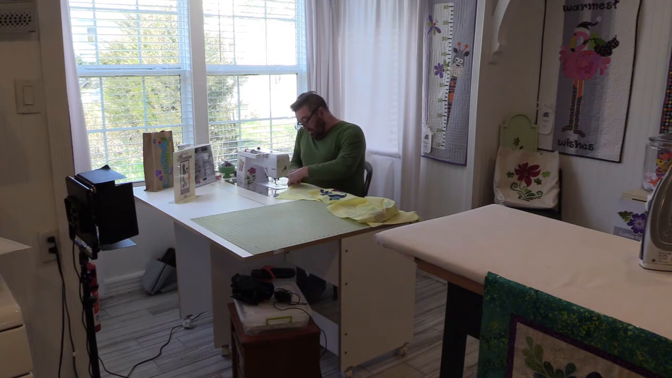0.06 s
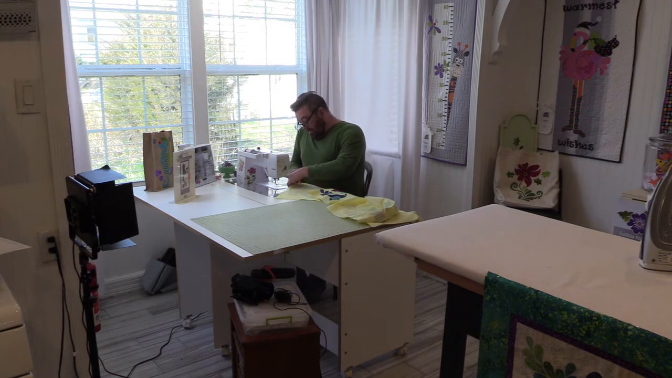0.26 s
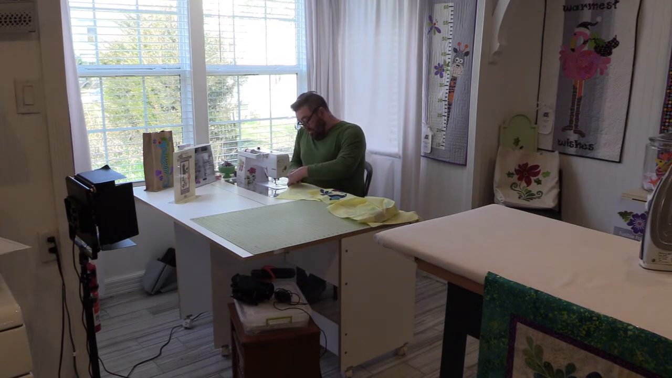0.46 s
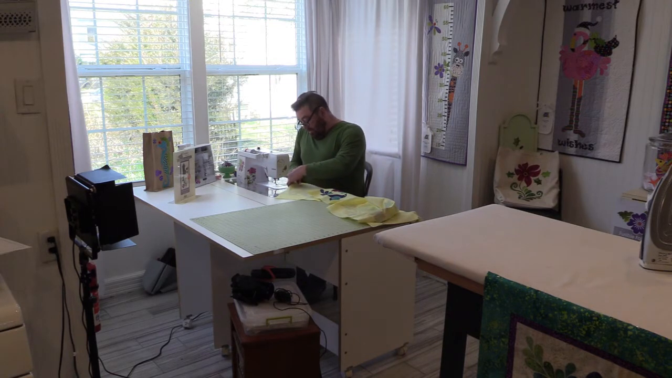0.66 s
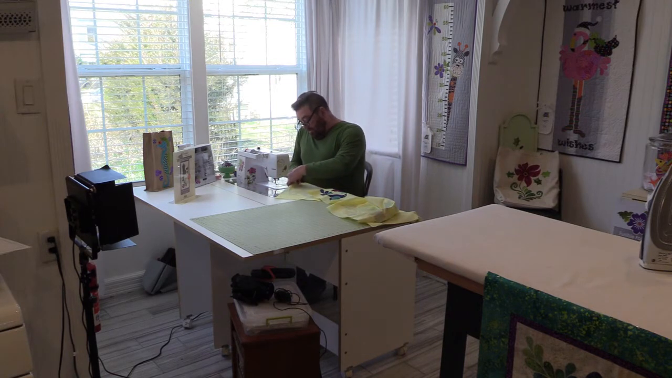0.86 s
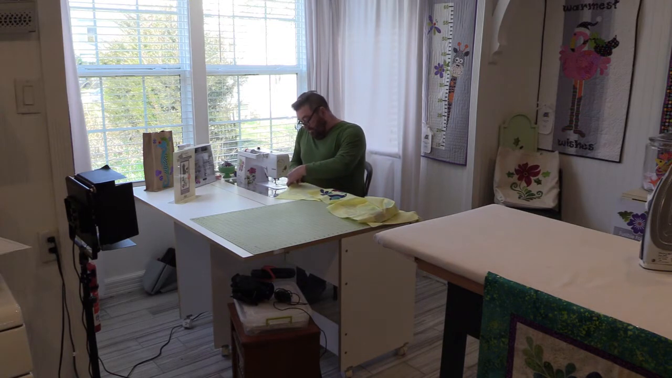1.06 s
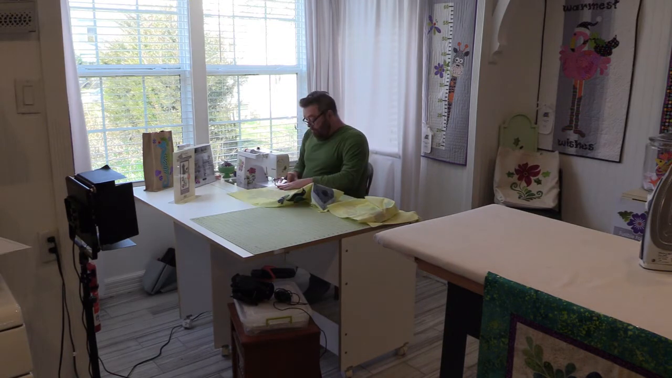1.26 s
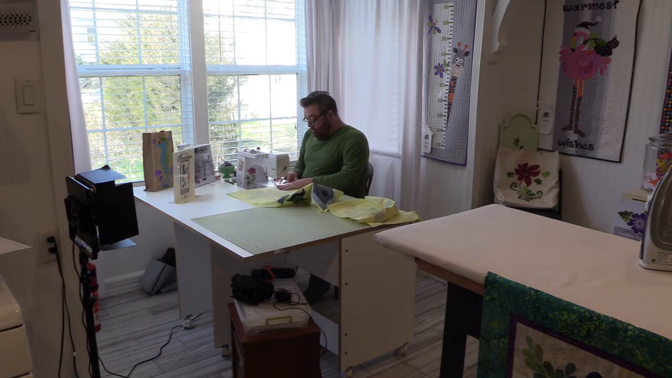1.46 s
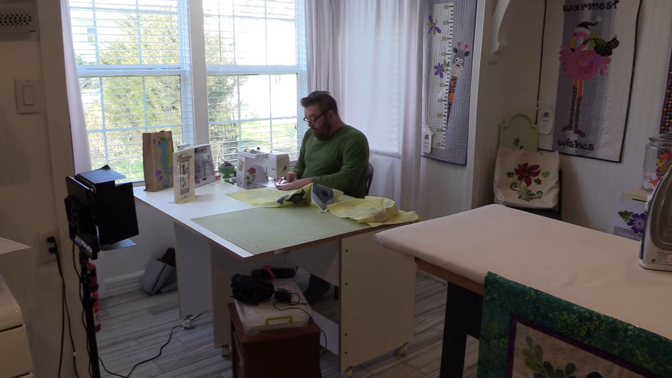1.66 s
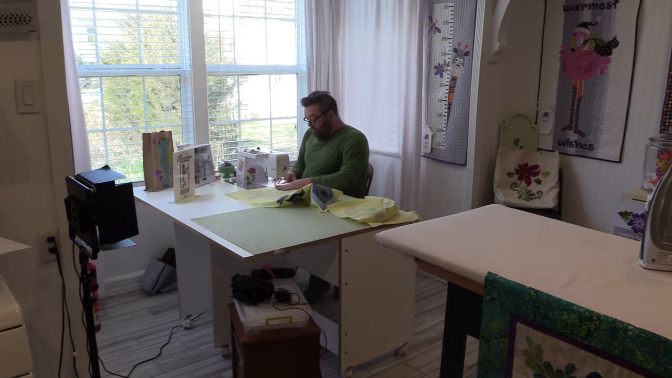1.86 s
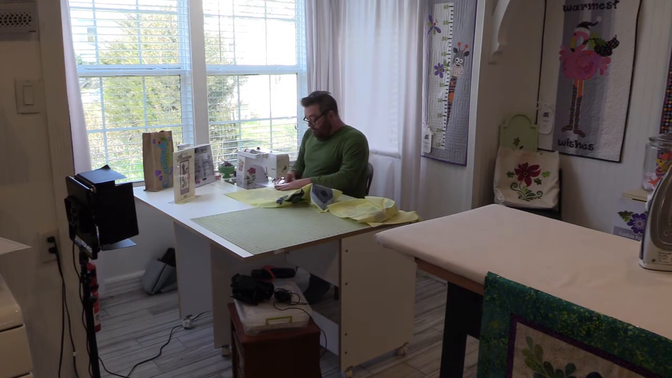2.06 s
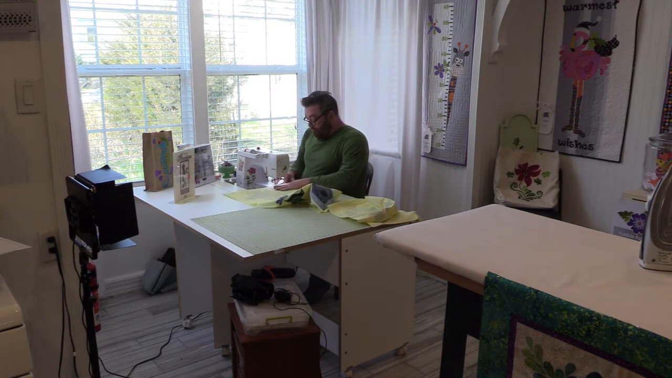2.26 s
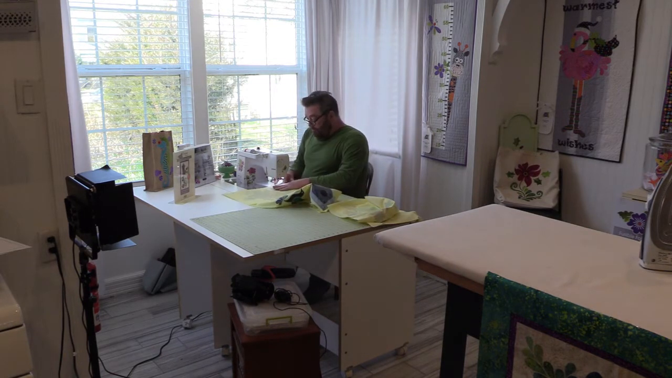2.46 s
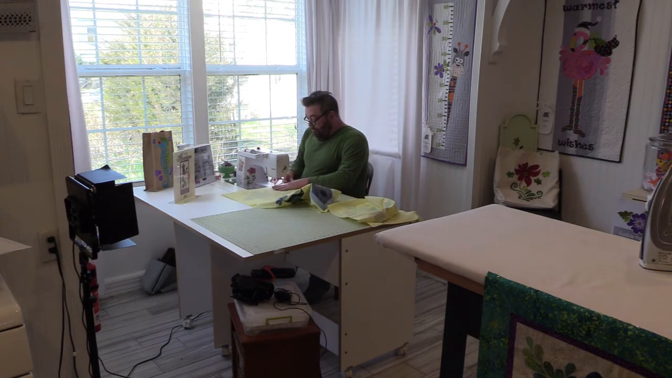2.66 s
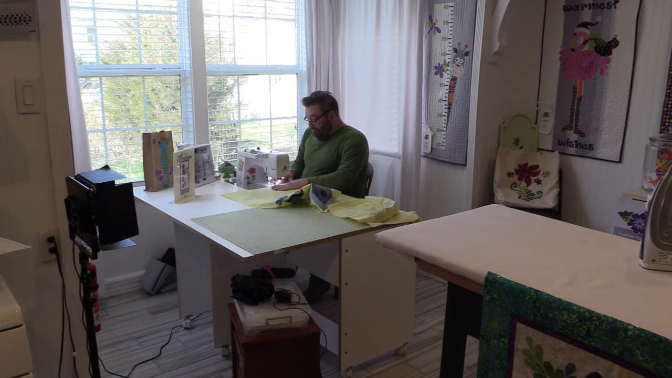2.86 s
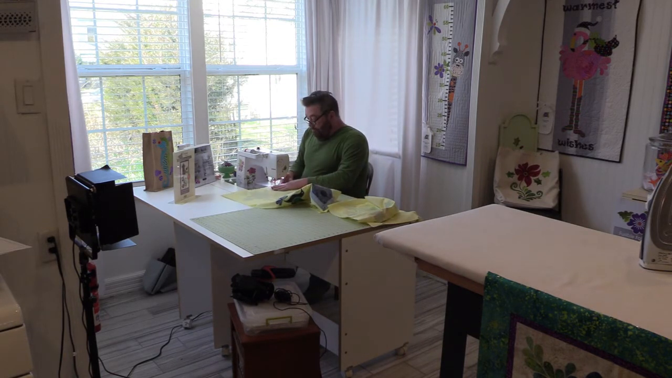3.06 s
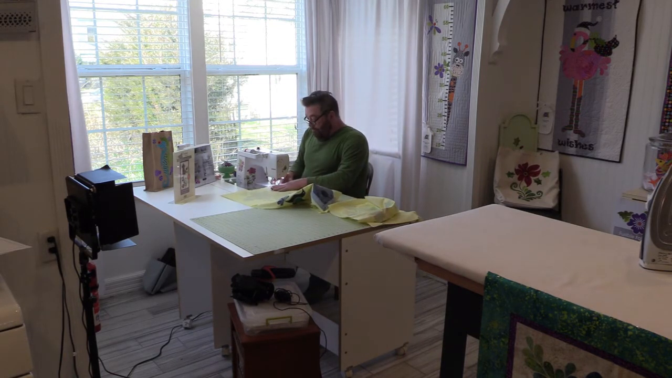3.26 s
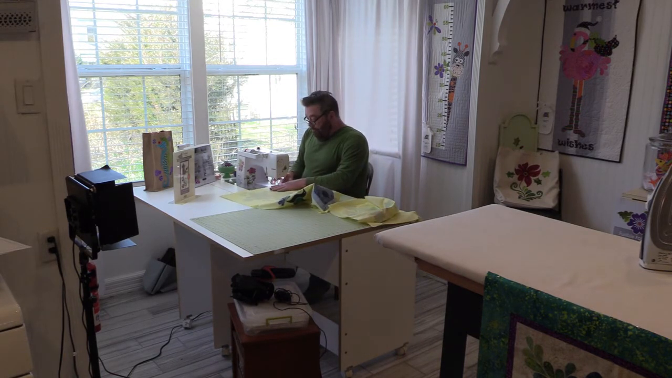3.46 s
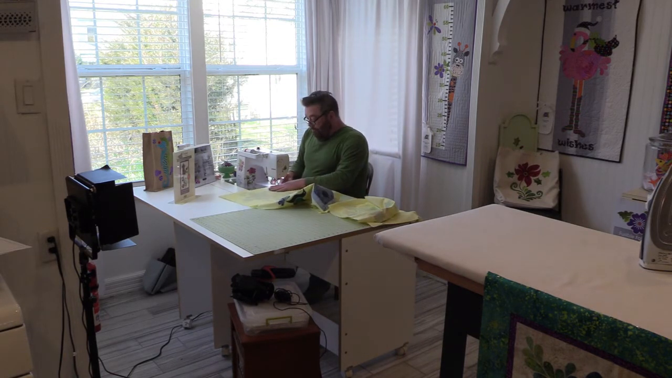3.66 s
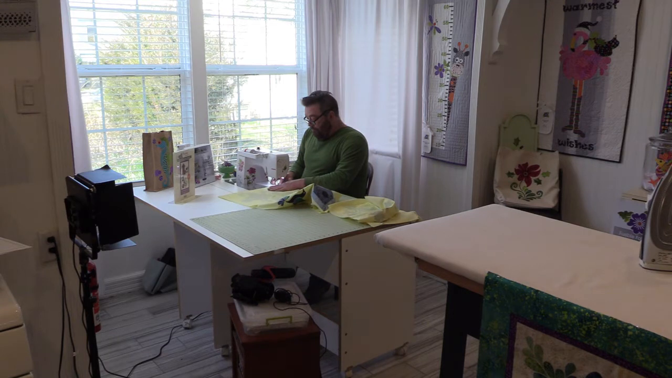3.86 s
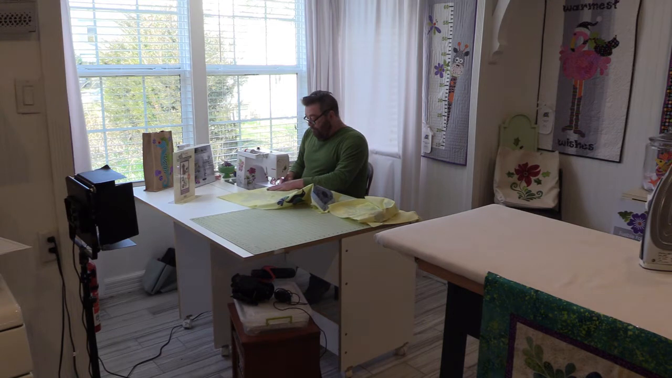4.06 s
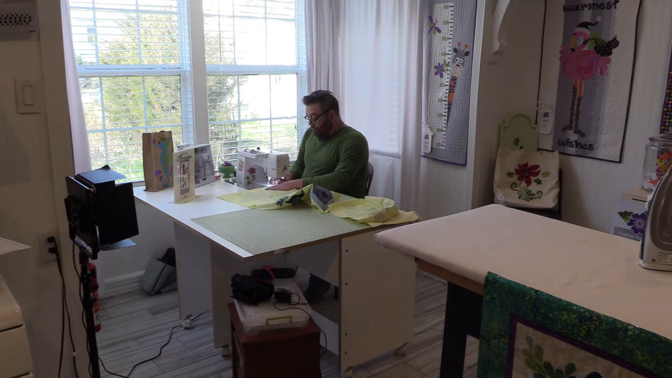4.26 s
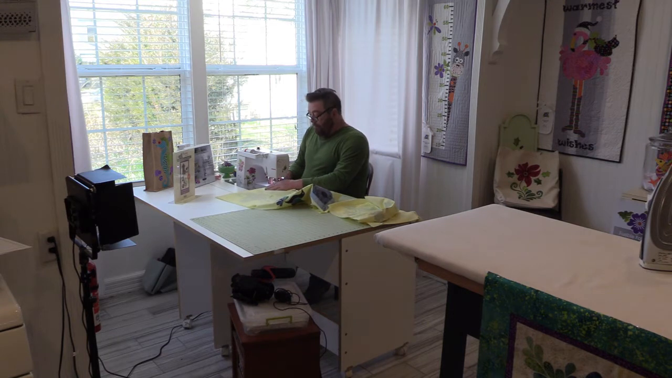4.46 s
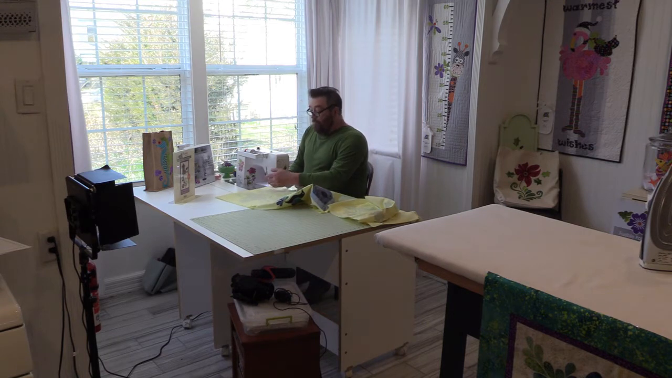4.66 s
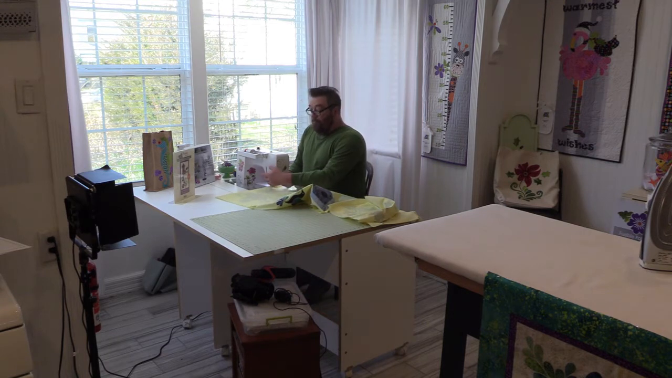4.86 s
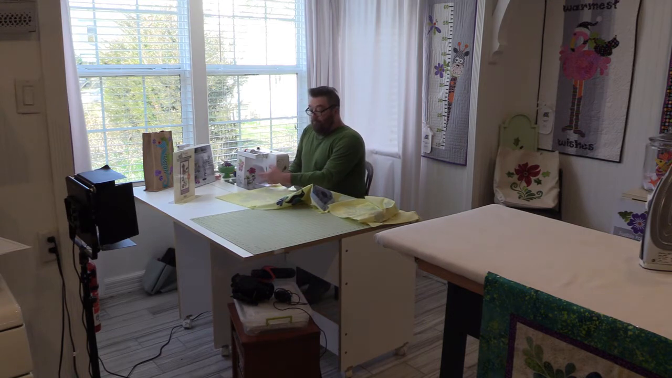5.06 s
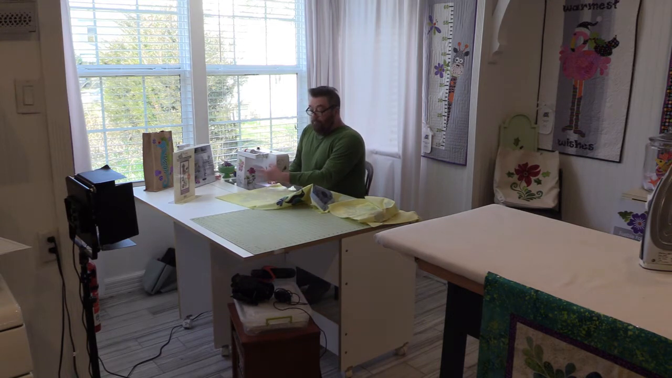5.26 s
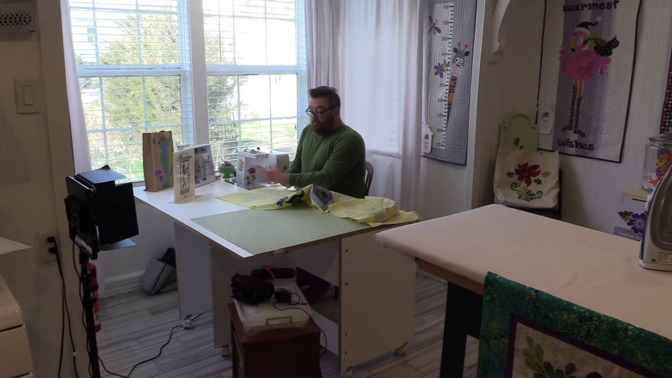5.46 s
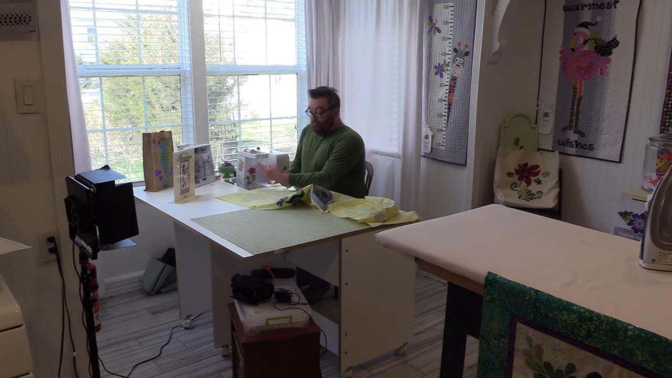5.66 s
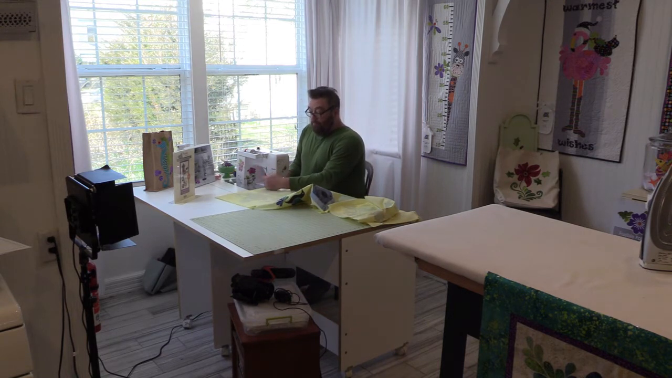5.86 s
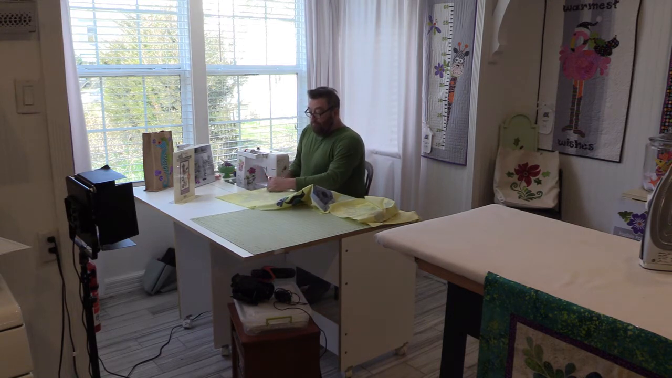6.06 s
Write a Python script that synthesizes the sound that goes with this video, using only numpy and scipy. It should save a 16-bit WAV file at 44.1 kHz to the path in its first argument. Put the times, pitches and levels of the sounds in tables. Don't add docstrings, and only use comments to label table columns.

```python
import sys
import numpy as np
from scipy import signal
from scipy.io import wavfile
from scipy.ndimage import uniform_filter1d

SR = 44100
rng = np.random.default_rng(int(sys.argv[2]) if len(sys.argv) > 2 else 0)


def output_pcm(signal):
    pcm = np.clip(np.atleast_2d(signal).T, -1, 1) * 32767
    wavfile.write(sys.argv[1], SR, np.round(pcm).astype(np.int16))


def linear_from_db(decibels):
    return 10 ** (np.asarray(decibels, float) / 20)


N = 269582
T = np.arange(N) / SR
HZ = np.fft.rfftfreq(4096, 1 / SR)
START_S, BRAKE_S, STOP_S = 1.27, 4.49, 4.98
TOP_S = 2.948
STEADY = slice(3 * SR, 4 * SR)
COARSE = slice(None, None, 256)


def evened(x, where=slice(None)):
    return x / np.sqrt(np.mean(x[where] ** 2) + 1e-20)


def read(points, hz):
    f, value = np.transpose(points)
    return np.interp(np.log(hz + 1), np.log(f + 1), value)


def colour(x, db):
    log_gain = np.log(linear_from_db(np.maximum(db, -100)))
    circle = np.r_[log_gain, log_gain[-2:0:-1]]
    taps = np.fft.ifft(np.exp(np.conj(signal.hilbert(circle)))).real
    return signal.oaconvolve(x, taps[:len(HZ)])[:N]


def peaks(hz, modes):
    return sum(height / (1 + (2 * (hz - f) / width) ** 2) for f, width, height in modes)


def after(s):
    return np.maximum(T - s, 0)


def burst(s, db, rise_s, t60):
    return np.minimum(after(s) / rise_s, 1) * linear_from_db(db - 60 * after(s) / t60)


# (frequency [Hz], level [dB])
HUM = [(60, -35), (180, -43.5), (240, -59), (300, -54.5), (420, -60.5), (540, -58), (660, -58), (780, -65),
       (900, -69), (1020, -64.5)]
# (frequency [Hz], level [dB per Hz])
AIR = [(500, -30), (720, -6), (1000, -4), (2300, -1.5), (3200, -8), (4000, -10.5), (8000, -13),
       (15700, -16.5)]
# (frequency [Hz], level [dB])
RUMBLE = [(15, 7.5), (30, 9.5), (75, -7), (120, 0), (350, -8.5), (670, -5), (900, -14), (1500, -40)]


def background():
    hum = sum(np.sqrt(2) * linear_from_db(db) * np.sin(2 * np.pi * (hz * T + rng.random())) for hz, db in HUM)
    air = evened(colour(rng.standard_normal(N), read(AIR, HZ)))
    rumble = evened(colour(rng.standard_normal(N), read(RUMBLE, HZ)))
    return hum + linear_from_db(-53.5) * air + linear_from_db(-46.5) * rumble


# (frequency [Hz], level [dB per Hz])
CLOTH = [(130, -34), (220, -10), (362, 2), (525, -10), (863, -10), (1370, -22), (2200, -15), (9000, -64)]
# (time [s], level [dB], t60 [s])
CLOTH_STROKES = [
    (0.0, -49, 1.0),
    (.165, -43, .6),
    (.33, -54, .5),
                 (4.9, -35, 0.28),
    (6.0, -43, 2.3),
]


def cloth():
    hands_s, hands_db = 4.9, -43.5
    level = linear_from_db(hands_db) * (T > hands_s)
    for s, db, t60 in CLOTH_STROKES:
        level = level + burst(s, db, 0.0019, t60)
    clumps = evened(uniform_filter1d(rng.standard_normal(N), size=900))
    rustle = rng.standard_normal(N) * linear_from_db(2.5 * clumps)
    return level * evened(colour(rustle, read(CLOTH, HZ)))


# (frequency [Hz], t60 [s])
RING_T60 = [(120, 0.045), (210, 0.02), (345, 0.11), (600, 0.03), (1100, 0.05), (2300, 0.018), (5300, 0.007),
            (8000, 0.012)]


def strike(blows, crack_hz, rise_s, crack_t60):
    out = np.zeros(N + SR)
    t = T[:SR // 2]
    band = signal.butter(3, [.4 * crack_hz, 1.5 * crack_hz], "bandpass", fs=SR)
    for s, ring_db, ring_hz, crack_db in blows:
        fade = linear_from_db(-60 * t / read(RING_T60, ring_hz))
        onset = np.minimum(t / max(1 / ring_hz, rise_s), 1)
        mode = fade * np.sin(2 * np.pi * ring_hz * t) * onset
        chatter = rng.standard_normal(len(t)) * fade * ring_hz * 4e-5
        chatter[0] = 1
        ring = signal.fftconvolve(mode, chatter)[:len(t)]
        puff = rng.standard_normal(len(t)) * linear_from_db(-60 * t / crack_t60) * np.minimum(t / rise_s, 1)
        crack = signal.lfilter(*band, puff)
        blow = linear_from_db(ring_db) * ring / abs(ring).max() + linear_from_db(crack_db) * crack / abs(crack).max()
        out[round(s * SR):][:len(t)] += blow
    return out[:N]


# (time [s], ring level [dB], ring [Hz], crack level [dB])
HAND_TAPS = [
    (.163, -40, 620, -33),
             (5.064, -28.5, 458, -44), (5.092, -38, 510, -43), (5.164, -33, 423, -41), (5.172, -31, 657, -38),
        (5.18, -42, 400, -45), (5.212, -36, 330, -50), (5.264, -34.5, 520, -48), (5.345, -39, 865, -46),
        (5.37, -37, 420, -36), (5.41, -22.5, 334, -39), (5.423, -43, 341, -46), (5.446, -45, 342, -55),
        (5.549, -29, 362, -50), (5.574, -29.5, 516, -35), (5.576, -36.5, 1150, -44)]


def taps():
    return strike(HAND_TAPS, crack_hz=1500, rise_s=.005, crack_t60=.06)


def shaft():
    halfway_s, runup_s, coast_s = 1.5, .115, .21
    cruise = 13.95 + np.interp(T, (2.15, 2.85), [0, .27])
    runup = 1 + np.exp(np.minimum((halfway_s - T) / runup_s, 2))
    return cruise / runup * np.exp(-np.minimum(after(BRAKE_S) / coast_s, 2.6))


def knocks(turns, angle, size, jitter_s, spread_db):
    at = np.arange(int(turns[-1]))[:, None] + angle
    s = np.interp(at, turns, T) + jitter_s * rng.standard_normal(at.shape)
    out = np.zeros(N)
    heights = size * linear_from_db(spread_db * rng.standard_normal(at.shape))
    np.add.at(out, (s * SR).astype(int) % N, heights)
    return out


# (time [s], level [dB], hiss relative level [dB], t60 [s])
LURCHES = [
    (1.282, -27.5, -22, 0.36),
    (1.384, -27, -32, 0.96),
    (1.527, -25, -3, 0.087),
    (1.588, -38, -22, .4),
    (1.98, -12, -22, 0.13),
    (4.5, -15.5, -13, 1),
    (4.755, -25, -12, 0.32),
    (4.814, -21, -22, 0.36),
    (4.857, -15.5, -31, 0.17),
]


def effort(speed):
    let_go_s = 4.606
    top_speed_so_far = np.maximum.accumulate(speed) / speed.max()
    run_db = -12 + 49 * np.log10(top_speed_so_far)
    casing_power = linear_from_db(run_db - 89 * after(let_go_s)) ** 2
    hiss_power = linear_from_db(run_db - 89 * after(let_go_s) - 10.5 - 90 * after(let_go_s)) ** 2
    for s, db, hiss_db, t60 in LURCHES:
        shake = burst(s, db, 0.0052, t60)
        casing_power = casing_power + shake ** 2
        hiss_power = hiss_power + (shake * linear_from_db(hiss_db)) ** 2
    return np.sqrt(casing_power), np.sqrt(hiss_power)


# (frequency [Hz], level [dB per Hz])
CASING = [(41, -51), (70, -24), (182, -15), (341, -11), (451, -8), (648, -2.5), (777, 0.5), (1050, -7),
          (1340, 0), (1960, -6), (2120, -12.5), (2310, -3), (3600, -13.5), (4680, -26), (7920, -120)]
# (frequency [Hz], width [Hz], height [dB])
PANELS = [(341, 147, 11.5), (878, 220, 2.5), (1430, 150, -1.5), (1600, 82, -0.4), (2102, 110, 10),
          (3460, 42, -1), (3710, 120, -4.5)]


def casing_db(hz):
    return read(CASING, hz) + peaks(hz, PANELS)


# (frequency [Hz], share [0 to 1])
REPEATS = [(100, .5), (350, .35), (700, .3), (1400, .1), (2800, .03)]


def casing_rattle(alike, turns):
    feed_turns = turns - np.interp(TOP_S, T, turns) - .16
    feed_db = 1.5 * np.cos(4 * np.pi * feed_turns)
    contacts = rng.standard_normal(N) * linear_from_db(1.0 * rng.exponential(1, N) + feed_db)
    loose = evened(contacts * (rng.random(N) < .2))
    share = np.clip(read(REPEATS, HZ), 0, 1)
    body = colour(alike, casing_db(HZ) + 10 * np.log10(share))
    body += colour(loose, casing_db(HZ) + 10 * np.log10(1 - share))
    return evened(body, STEADY)


# (frequency [Hz], level [dB per Hz])
SLIDING = [(1940, -23), (3300, -7), (3810, -14.5), (4200, -13), (5510, -16.5), (5960, -19), (10700, -27.5),
           (15600, -41)]


def sliding_hiss(alike, turns):
    stroke_db = 1.1 * np.cos(8 * np.pi * turns + 0.96)
    stroke_db += 0.4 * np.cos(4 * np.pi * turns) + 0.7 * np.cos(16 * np.pi * turns)
    tick_db = 1.3 * np.minimum(rng.exponential(1, N), 7) + stroke_db
    ticks = rng.standard_normal(N) * linear_from_db(tick_db) * (rng.random(N) < .5)
    return evened(colour(ticks + .1 * alike, read(SLIDING, HZ)), STEADY)


def struck(turns, blows, modes):
    response = peaks(HZ, [(hz, width, linear_from_db(db)) for hz, width, db in modes])
    angle, db = np.transpose(blows)
    angle = (angle + np.interp(TOP_S, T, turns)) % 1
    train = knocks(turns, angle, linear_from_db(db), jitter_s=3e-4, spread_db=2)
    return evened(colour(train, 20 * np.log10(response)), STEADY)


# (shaft angle [turns], level [dB])
NEEDLE = [
    (0.08, -4),
    (0.2, -5),
    (0.55, 0),
    (.66, -3),
    (.78, -5),
]
# (frequency [Hz], width [Hz], height [dB])
BED = [(362, 40.4, 10), (459.6, 18, 5), (529.6, 50, -3), (832, 330, -3.5)]


def needle_bar(turns):
    return linear_from_db(-4.5) * struck(turns, NEEDLE, BED)


# (shaft angle [turns], level [dB])
HOOK = [
    (.03, -2),
    (.39, 0),
    (.53, 0),
    (.66, -3),
    (.79, 1),
    (.92, -4),
]
# (frequency [Hz], width [Hz], height [dB])
RACE = [(520, 120, 0)]


def bobbin_hook(turns):
    return linear_from_db(-12) * struck(turns, HOOK, RACE)


# (shaft angle [turns], level [dB])
TAKE_UP = [
    (.19, -3),
    (.69, 0),
]
# (frequency [Hz], width [Hz], height [dB])
ARM = [(2070, 220, 5), (5400, 2500, -16.5)]


def thread_lever(turns):
    return linear_from_db(-19.5) * struck(turns, TAKE_UP, ARM)


def wavering(turns, k):
    drift = evened(uniform_filter1d(rng.standard_normal((2, len(T[COARSE]))), size=24, axis=1))
    phase = 2 * np.pi * (k * turns + rng.random()) + np.interp(T, T[COARSE], .004 * k * drift[1])
    return np.sqrt(2) * np.interp(T, T[COARSE], linear_from_db(2.0 * drift[0])) * np.sin(phase)


# (multiple of the stitch rate, level [dB])
ORDERS_DB = [(5, -41), (6, -45), (8, -40), (9, -44), (10, -38), (11, -43), (12, -43), (13, -40), (15, -39),
             (16, -40), (17, -32), (18, -36), (19, -32), (24, -25), (26, -33), (30, -28), (32, -25.5),
             (38, -35), (40, -28), (44, -33), (52, -31), (54, -34), (56, -32), (58.35, -30), (64, -29.5),
             (68, -33), (70, -40), (71, -35), (78, -36), ]


def shaft_tones(turns, speed):
    out = np.zeros(N)
    for k, db in ORDERS_DB:
        lift_db = casing_db(k * speed[COARSE]) - casing_db(k * speed.max())
        out += np.interp(T, T[COARSE], linear_from_db(db + lift_db)) * wavering(turns, k)
    return out


# (multiple of the stitch rate, level [dB])
TEETH = [(150, 0), (146, -9), (147, -6), (154, -11), (142, -12), (138, -13), (92, 2), (125, -6), (184, -2),
         (229.5, -7), (242.8, -6)]
# (frequency [Hz], width [Hz], height [dB])
COVER = [(1455, 110, 11), (1720, 200, 4), (1900, 130, 11), (2080, 170, 10)]


def gears(turns, speed):
    out = np.zeros(N)
    for k, db in TEETH:
        lift_db = peaks(k * speed[COARSE], COVER)
        out += np.interp(T, T[COARSE], linear_from_db(db + lift_db)) * wavering(turns, k)
    level_db = -35.5 + 9 * np.log10(speed / speed.max()) - 150 * after(BRAKE_S)
    return linear_from_db(level_db) * out


def machine():
    speed = shaft()
    running = 1. * (T > START_S) * (T < STOP_S)
    turns = np.cumsum(speed * running + 1e-6) / SR
    on = uniform_filter1d(running, size=300)
    level, hiss_level = effort(speed)
    slow = np.log10(speed.max() / speed)
    density = np.sqrt(speed.max() / speed)
    pattern = knocks(turns, rng.random(160), rng.standard_normal(160), jitter_s=6e-5, spread_db=1.5)
    alike = evened(pattern * density, STEADY)
    body = linear_from_db(-6 * slow) * casing_rattle(alike, turns)
    stitch_parts = needle_bar(turns) + bobbin_hook(turns) + thread_lever(turns)
    body += linear_from_db(11 * slow) * stitch_parts
    rattle = on * linear_from_db(-5.0) * (level * body + hiss_level * sliding_hiss(alike, turns))
    whine = level / linear_from_db(-12) * shaft_tones(turns, speed) + gears(turns, speed)
    return rattle, on * whine


# (time [s], ring level [dB], ring [Hz], crack level [dB])
CLUNKS = [(1.281, -39, 286, -33), (1.3, -29.5, 520, -38), (1.318, -29, 540, -35), (1.331, -28, 930, -31),
          (1.387, -29, 1020, -30), (1.392, -22, 338, -44), (1.408, -21, 385, -40), (1.445, -23, 360, -40),
          (1.462, -27, 1350, -30), (1.475, -24, 346, -35), (1.493, -22, 378, -31), (1.533, -13, 347, -27),
          (1.56, -25, 350, -32), (1.587, -25, 1470, -8), (1.6, -14, 1440, -31), (1.61, -20, 520, -19),
          (1.63, -24, 405, -20), (1.655, -8, 520, -18), (1.685, -14, 994, -26), (1.7, -15, 347, -24),
          (1.74, -16, 345, -26), (1.77, -10, 378, -24), (1.772, -11, 784, -24), (1.82, -13, 348, -24),
          (1.85, -13, 794, -26), (4.557, -5, 1445, -9), (4.565, -8, 1540, -18), (4.538, -11, 734, -7),
          (4.58, -12, 694, -19), (4.594, -6, 521, -3), (4.612, -7, 722, -4.5), (4.757, -14, 369.5, -11.5),
          (4.758, -19, 534, -36), (4.772, -12, 703, -27), (4.787, -23, 350, -28), (4.805, -23, 358, -35),
          (4.83, -24, 697, -18.5), (4.853, -20.5, 468, -19), (4.866, -28, 363, -21), (4.898, -31, 382, -36),
          (4.93, -29, 410, -38)]


def clunks():
    return strike(CLUNKS, crack_hz=1200, rise_s=.001, crack_t60=.07)


# (time [s], ring level [dB], ring [Hz], crack level [dB])
TICKS = [(1.281, -50, 5450, -38), (1.307, -48, 5180, -38), (1.387, -36, 2120, -34), (1.41, -34, 2030, -40),
         (1.484, -40, 5400, -41), (1.488, -30, 1780, -41), (1.49, -36, 3330, -42),
         (1.521, -19.5, 2520, -23.5), (5.109, -38, 860, -43), (5.161, -42, 2660, -42),
         (3.8, -25, 6960, -43), (5.596, -52, 7000, -35), (5.604, -31.5, 3500, -49), (5.616, -37, 3380, -52)]


def ticks():
    return strike(TICKS, crack_hz=5500, rise_s=.001, crack_t60=.07)


# (time [s], ring level [dB], ring [Hz], crack level [dB])
THUDS = [
    (1.281, -33, 125, -25),
    (1.8, -22, 120, -40),
    (1.9, -19, 130, -40),
    (1.96, -25, 140, -40),
    (4.86, -26, 133, -21.5),
    (6.028, -27, 70, -50),
    (5.44, -31, 131, -55),
]


def thuds():
    return strike(THUDS, crack_hz=500, rise_s=.003, crack_t60=.1)


# (time [s], ring level [dB], ring [Hz], crack level [dB])
LATCHES = [(1.38, -46, 11100, -39), (1.389, -37, 7940, -38), (1.553, -44, 13000, -36),
           (1.583, -44, 13000, -43), (1.608, -44, 13000, -35), (1.655, -42, 14500, -24),
           (1.462, -46, 7700, -38), (4.437, -39, 10900, -14), (4.493, -32, 9050, -32),
           (4.507, -32, 12600, -17), (4.615, -37, 8540, -31), (4.656, -42, 8000, -40),
           (4.679, -40, 8600, -36), (4.737, -63, 11000, -47.5), (4.79, -46, 10900, -49.5),
           (4.818, -31, 8000, -40), (4.819, -35, 5100, -29), (4.859, -30, 7960, -38),
           (4.86, -30, 5000, -26.5), (4.872, -39, 5460, -34), (5.708, -54, 9000, -29.5)]


def latches():
    return strike(LATCHES, crack_hz=7200, rise_s=.001, crack_t60=.05)


# (time [s], ring level [dB], ring [Hz], crack level [dB])
LEVER = [(5.161, -44, 1970, -31), (5.692, -35, 1920, -28), (5.709, -17, 2310, -13), (5.714, -13, 2480, -19),
         (5.717, -19, 1880, -24), (5.72, -16.5, 550, -30), (5.722, -18, 2360, -20), (5.729, -34, 2290, -21),
         (5.735, -19, 349, -26), (5.738, -17, 700, -37), (5.728, -27, 470, -25), (5.745, -27, 610, -33),
         (5.765, -29, 346, -31), (5.78, -37, 2240, -36), (5.8, -34, 2200, -42), (5.84, -44, 2280, -52),
         (5.875, -45, 2320, -57)]


def lever():
    return strike(LEVER, crack_hz=1900, rise_s=.001, crack_t60=.08)


# (time [s], ring level [dB], ring [Hz], crack level [dB])
SCRAPES = [
    (5.657, -27, 944, -29.5),
    (5.668, -33, 1004, -31),
    (5.679, -24, 943, -31),
    (5.692, -31, 960, -30),
    (5.875, -54, 6400, -46),
    (5.93, -54, 6800, -36.5),
]


def scrapes():
    return strike(SCRAPES, crack_hz=3000, rise_s=.006, crack_t60=.12)


# (time [s], ring level [dB], ring [Hz], crack level [dB])
SWISHES = [
    (5.66, -43, 4400, -48),
    (5.912, -45, 3170, -36.5),
    (6.0, -58, 6500, -39),
    (6.03, -60, 7500, -37),
    (6.062, -58, 6460, -37),
]


def swishes():
    return strike(SWISHES, crack_hz=7000, rise_s=.015, crack_t60=.15)


# (time [s], ring level [dB], ring [Hz], crack level [dB])
BUMPS = [
    (6.002, -13.5, 194, -31),
    (6.004, -33, 970, -38),
    (6.016, -14.5, 208, -43),
    (6.023, -16, 117, -35),
    (6.034, -34, 600, -41),
    (6.032, -22, 230, -37),
    (6.058, -24, 190, -37),
    (6.045, -17, 114, -30.5),
    (6.07, -28, 150, -34),
    (6.088, -22, 197, -32),
]


def bumps():
    return strike(BUMPS, crack_hz=2000, rise_s=.001, crack_t60=.1)


# (frequency [Hz], t60 [s])
ROOM = [(200, .4), (1000, .38), (4000, .24), (12000, .14)]


def room(x):
    echoes = np.zeros(SR // 2)
    at = np.arange(200, len(echoes) - 20, 20)
    echoes[at + rng.integers(0, 20, len(at))] = rng.choice([-1., 1.], len(at))
    hz, t, z = signal.stft(echoes, SR, nperseg=256)
    fade = linear_from_db(-60 * t / read(ROOM, hz)[:, None])
    tail = signal.istft(z * fade, SR, nperseg=256)[1]
    return signal.fftconvolve(x, tail / np.linalg.norm(tail))[:N]


def scene():
    quiet = background() + cloth()
    blows = taps()
    rattle, whine = machine()
    blows = blows + clunks() + ticks() + thuds() + latches()
    blows = blows + lever() + scrapes() + swishes() + bumps()
    echoes = room(linear_from_db(-10.0) * rattle + linear_from_db(-8) * blows)
    mono = linear_from_db(2.5) * rattle + blows + echoes + whine + quiet
    return np.array([mono, mono])


def noise_filled(x):
    hz, t, z = signal.stft(x, SR, nperseg=1024)
    chance = rng.random((len(hz) // 18 + 1, len(t) // 3 + 1))
    patch = chance[np.arange(len(hz)) // 18][:, np.arange(len(t)) // 3]
    power = abs(z[0]) ** 2
    loud = uniform_filter1d(power.sum(0), size=15) > linear_from_db(-42)
    hush = power[hz > 3000].sum(0) < linear_from_db(-104)
    busy = np.interp(hz, [4000, 8900, 9000, 11000, 13000, 15500], [0, .012, .2, .12, .4, .2])[:, None]
    still = np.interp(hz, [2800, 4200, 8800, 8900], [0, .85, .9, .03])[:, None]
    empty = np.interp(hz, [9000, 11500, 12300, 13200], [0, .1, .6, .08])[:, None]
    noise = z * np.exp(2j * np.pi * rng.random(z.shape))
    z = np.where(loud & (patch < busy), 1.5 * noise, z + .3 * noise * (hush & (patch < still)))
    kept = ~(loud & (patch > 1 - empty))
    return signal.istft(z * kept, SR, nperseg=1024)[1][:, :N]


def top_cut(x):
    return signal.sosfilt(signal.butter(12, 15710, fs=SR, output="sos"), x)


def record(dry):
    limited = dry / (1 + abs(dry / .97) ** 6) ** (1 / 6)
    edge = signal.firwin(511, 15750, window=("kaiser", 9), fs=SR)[None]
    mix = signal.oaconvolve(noise_filled(limited), edge, "same")
    return top_cut(mix)


dry = scene()
out = record(dry)
output_pcm(out)
```